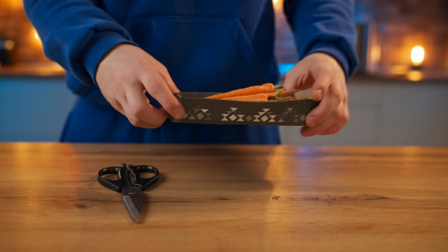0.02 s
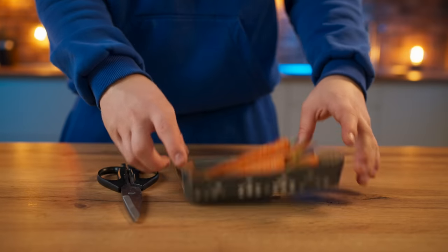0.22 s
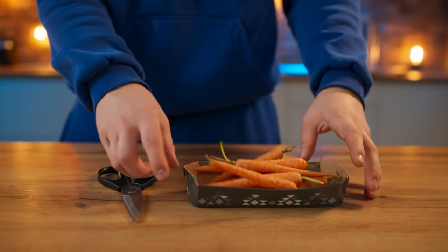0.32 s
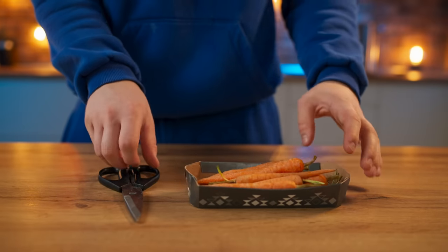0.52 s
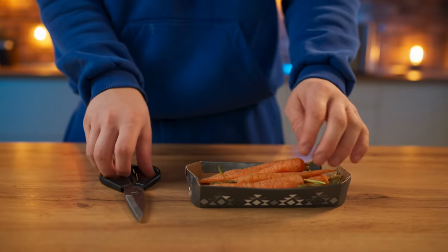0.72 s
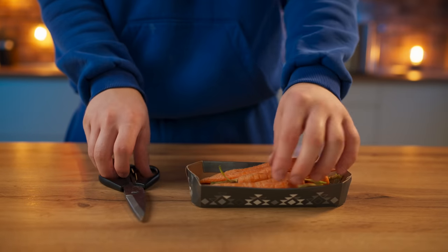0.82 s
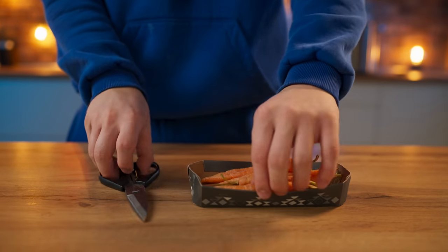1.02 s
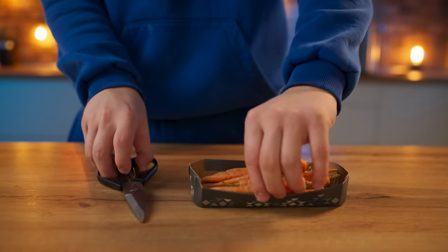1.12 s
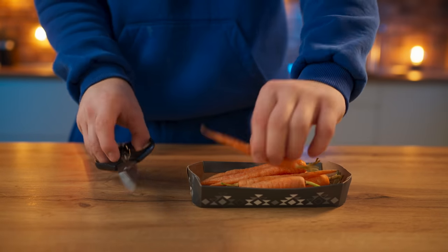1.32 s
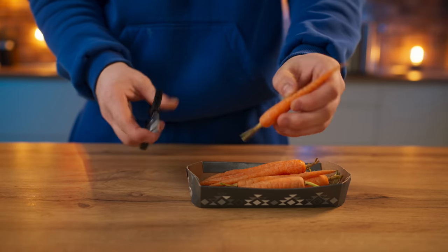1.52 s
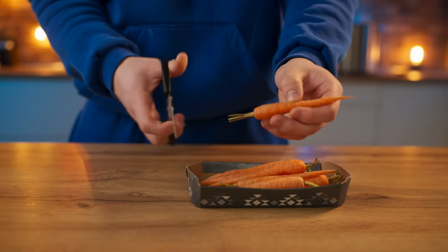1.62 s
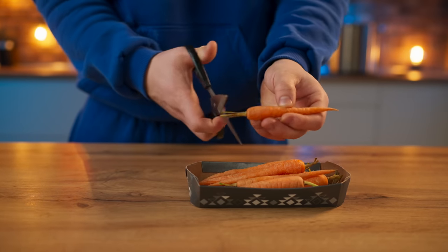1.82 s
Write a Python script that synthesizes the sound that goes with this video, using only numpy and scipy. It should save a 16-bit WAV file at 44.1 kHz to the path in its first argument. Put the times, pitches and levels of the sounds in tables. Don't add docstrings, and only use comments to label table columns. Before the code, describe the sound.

A carrot-filled cardboard tray slaps onto a wooden table at about 0.23 s, a quick cluster of crack, rattle, air clap and woody thud with a short room tail. Faint scrapes and a tick precede it. Carrots roll and bump until 0.5, then knock with a bright click near 0.78. Light scissor scrapes continue to 1.3; metallic ticks and sleeve rustle follow at 1.5-1.6 over faint hum.

```python
import sys
import numpy as np
from scipy import signal
from scipy.fft import rfft, irfft
from scipy.io import wavfile
from scipy.ndimage import uniform_filter1d

SR = 44100
rng = np.random.default_rng(int(sys.argv[2]) if len(sys.argv) > 2 else 0)


def ratio(d):
    e = np.asarray(d, float) / 20
    return 10 ** e


def unload_wav(signal):
    wavfile.write(
        sys.argv[1],
        SR,
        np.round(np.clip(np.atleast_2d(signal).T, -1, 1) * 32767).astype(np.int16),
    )


N = 83790
T = np.arange(N) / SR

# pitch in Hz, level in dB, t60 in seconds.
TRAY_MODES = [(980, -4, 0.02), (1160, -10.5, 0.047), (1516, -4.5, 0.025), (1700, -5, 0.059),
              (2147, 3.5, 0.018), (2600, 0, 0.013), (3284, -0.5, 0.024), (3800, 2, 0.015),
              (4700, -14.5, 0.0062)]


def level(x, db):
    return x * ratio(db) / np.sqrt(np.mean(x ** 2))


def band(x, hz, width_hz):
    return signal.lfilter(*signal.iirpeak(min(hz, .45 * SR), hz / width_hz, fs=SR), x)


def steep_band(x, hz, width_hz):
    return band(band(x, hz, width_hz), hz, width_hz)


def ring(x, modes):
    out = 0
    for k, (hz, db, t60) in enumerate(modes):
        pole = np.exp(2j * np.pi * hz / SR - np.log(1000) / (t60 * SR))
        out = out + (-1) ** k * ratio(db) * signal.lfilter([1], [1, -pole], x).imag
    return out / 20


def soft(x, push_s):
    keep = np.exp(-1 / (push_s * SR))
    once = signal.lfilter([1 - keep], [1, -keep], x)
    return signal.lfilter([1 - keep], [1, -keep], once)


def blow(at, push_s):
    t = np.maximum(T - at, 0) / push_s
    return t * np.exp(-t) / (push_s * SR)


def burst(at, t60):
    return np.clip((T - at) * SR / 4, 0, 1) * ratio(-60 * np.maximum(T - at, 0) / t60)


def walk(rate):
    k = int(SR / rate)
    steps = np.repeat(rng.standard_normal(N // k + 1), k)
    return 1.3 * uniform_filter1d(steps, k)[:N]


def air():
    # frequency in Hz, density in dB per Hz.
    air_spectrum = [(30, -19), (55, -20), (110, -16.5), (200, -14.5), (900, -23), (1200, -28.5),
                    (3700, -31), (16000, -60.5)]
    # frequency in Hz, level in dB rms.
    mains = [(50, -71.5), (150, -69)]
    air_db, wobble_db = -69, 1.2
    hz = np.maximum(np.arange(N // 2 + 1) * SR / N, 1)
    shape_hz, shape_db = np.array(air_spectrum).T
    shape = np.interp(np.log(hz), np.log(shape_hz), shape_db)
    spectrum = rfft(rng.standard_normal(N)) * ratio(shape) * (hz > 20)
    out = level(irfft(spectrum, N), air_db)
    for f, db in mains:
        out = out + ratio(db + wobble_db * walk(14)) * np.sqrt(2) * np.sin(2 * np.pi * f * T)
    return out


def sleeve():
    # time in seconds, level in dB.
    rustle = [(0, -87), (.7, -78), (.8, -71), (1.25, -78), (1.4, -69.5), (1.6, -70), (1.8, -79.5),
              (1.9, -89)]
    cloth = level(band(rng.standard_normal(N), 6000, 12000), 0) * ratio(walk(14))
    return cloth * ratio(np.interp(T, *np.array(rustle).T))


def scrapes():
    # start in seconds, length in seconds, level in dB, pitch in Hz, width in Hz.
    strokes = [(0.071, 0.17, -62.5, 2300, 1700), (0.03, 0.17, -62.5, 1100, 1100),
               (0.095, 0.12, -66.5, 7850, 9000), (0.69, 0.077, -67, 3800, 580),
               (.65, 0.055, -70, 7900, 9600), (0.862, 0.067, -62.5, 3340, 1900),
               (0.738, 0.12, -58.5, 2650, 2500), (0.957, 0.13, -62.5, 3440, 480),
               (0.967, 0.18, -70, 1380, 300), (1.082, 0.056, -54.5, 3170, 710),
               (1.2, 0.068, -68, 3800, 5200), (1.092, 0.057, -57, 1870, 1360),
               (1.3, 0.037, -67.5, 2300, 1050), (1.277, 0.056, -63, 2770, 1600),
               (1.28, .055, -66, 9400, 10000), (1.475, 0.099, -60, 3700, 850),
               (1.497, 0.039, -51.5, 8900, 2800), (1.518, 0.035, -57.5, 7500, 1220),
               (1.51, 0.044, -60, 1920, 420), (1.499, 0.063, -61.5, 12300, 1210),
               (1.57, 0.016, -69, 11300, 300)]
    grain_db, grains_per_s = 3, 830
    grain = ratio(grain_db * walk(grains_per_s)) * rng.standard_normal(N)
    out = 0
    for s, length, db, hz, width_hz in strokes:
        swell = np.sin(np.pi * np.clip((T - s) / length, 0, 1)) ** 1.5
        out = out + level(steep_band(grain, hz, 1.2 * width_hz), db) * swell
    return out


def ticks():
    # start in seconds, level in dB, pitch in Hz, knock into the tray in dB.
    clicks = [(0.104, -65, 800, 6), (0.167, -39, 1700, -20), (0.186, -60, 1780, 12),
              (0.402, -45.5, 7150, -38.5), (0.5532, -49, 6340, -12), (.600, -66, 4900, -10),
              (0.684, -55.5, 3800, 2), (0.7332, -46.5, 3600, 7.5), (0.739, -56.5, 9000, 17),
              (0.7468, -47, 4480, 9), (.761, -58, 8000, -20), (0.7763, -23, 8400, -64),
              (0.8087, -52, 11000, -30), (0.7807, -26.5, 1200, -22), (0.797, -27, 900, -20),
              (0.809, -35.5, 4950, 3.5), (0.928, -56, 1500, 2.5), (0.9747, -40.5, 4000, -0.5),
              (.9920, -46.5, 4170, -5), (1.098, -51, 3510, 6), (1.126, -50.5, 5394, 7),
              (1.188, -55, 2600, -5), (1.189, -59, 9000, -10), (1.211, -51, 2530, 3),
              (1.212, -60, 8450, -6), (1.533, -54, 3900, -3), (1.515, -52, 9000, -15),
              (1.52, -51.5, 9000, -30), (1.609, -58, 9000, -14), (1.6157, -43.5, 8450, -26),
              (1.614, -40.5, 2300, -18)]
    # pitch in Hz, level in dB, t60 in seconds.
    blades = [(3800, -3, .05), (5200, -4.5, .03), (7000, -0.5, .03), (8350, 0, 0.025), (11000, -22, 0.047),
              (12700, -5.5, .04)]
    click_t60_s, steel_db = .016, -14.5
    hand_damping = 0.6
    noise, out, knock = rng.standard_normal(N), 0, 0
    for s, db, hz, knock_db in clicks:
        click = ratio(db) * burst(s, click_t60_s) * noise
        edges = [hz / 2.3, min(hz * 1.8, .45 * SR)]
        sos = signal.butter(4, edges, "bandpass", fs=SR, output="sos")
        out = out + signal.sosfilt(sos, click)
        knock = knock + ratio(knock_db) * click
    held_tray = [(hz, db, hand_damping * t60) for hz, db, t60 in TRAY_MODES]
    return out + ratio(steel_db) * ring(out, blades) + ring(knock, held_tray)


def tray():
    # start in seconds, level in dB, rattle length in seconds, crack in dB.
    contacts = [
        (0.2254, -29, 0.019, -14.5),
        (0.2315, -19.5, 0.011, -1.5),
        (.2350, -11, 0.01, 4.5),
        (0.2387, -9.5, 0.0044, -1),
        (0.2445, -17, 0.0013, -3),
        (.247, -20.5, 0.0034, -12),
    ]
    # pitch in Hz, level in dB, t60 in seconds.
    table_modes = [(62, -14.5, .25), (40, -24, .1), (123.2, -1, .2), (245.7, -6, 0.12), (263, 2, 0.09),
                   (388, -4, .07), (184, -5.5, 0.12), (344, -10.5, 0.13), (527, -8, 0.052), (658, 0, 0.11),
                   (800, 0.5, 0.052), (1059, -7.5, 0.065)]
    strike_db, clap_db, crack_db, thud_db = 5, 0.5, -4, -2
    crack_t60_s, thud_push_s = .012, 0.00043
    noise = rng.standard_normal(N)
    rattle, crack, strike, thud = 0, 0, 0, 0
    for k, (s, db, length, sharp_db) in enumerate(contacts):
        rattle = rattle + ratio(db) * burst(s, 4 * length) * noise
        crack = crack + ratio(db + sharp_db) * burst(s, crack_t60_s) * noise
        strike = strike + (-1) ** k * ratio(db + strike_db) * blow(s, 1 / SR)
        thud = thud + ratio(db) * blow(s, thud_push_s)
    walls = ring(10 * strike + 1.2 * rattle, TRAY_MODES)
    clap = ratio(clap_db) * steep_band(rattle, 2560, 4600)
    snap = ratio(crack_db) * band(crack, 6500, 9000)
    wood = ratio(thud_db) * 10 * ring(thud, table_modes)
    return walls + clap + snap + wood


def carrots():
    # time in seconds, force in dB.
    roll_force = [(.25, -42.5), (.4, -49.5), (.52, -60), (.56, -54), (.605, -53.5), (.67, -56), (.725, -68),
                  (.74, -43), (.8, -44), (.9, -53), (1.0, -57.5), (1.14, -65.5), (1.28, -78.5)]
    # start in seconds, force in dB, push in seconds.
    falls = [(.548, -34, 0.00044), (.56, -31, 0.00033), (.6, -26.5, 0.00029), (.612, -24.5, 0.0013),
             (.633, -33, 0.00064), (.671, -36, .0001), (.747, -26, 0.00018), (.765, -15.5, 0.0017),
             (.781, -20.5, 0.000088), (.797, -24, 0.0014), (.82, -32, 0.000067), (.9, -37.5, 0.00017),
             (.926, -34, 0.000078), (.976, -21.5, .001), (.993, -36.5, 0.000069), (1.03, -41, 0.0016),
             (1.15, -37, 0.00092), (1.212, -36, 0.00029)]
    # pitch in Hz, level in dB, t60 in seconds.
    loaded = [(110.9, -0.5, 0.088), (140, 1, 0.11), (248, -2.5, .09), (294, -2, 0.071), (338.8, -5, 0.073),
              (530, 0, .055), (561, -1, .045), (684, -1, .05), (800, -3.5, 0.036), (1042, -2.5, 0.025),
              (1287, -4, 0.027), (1545, -3.5, 0.03), (1852, -4.5, 0.018), (2130, -8.5, .02)]
    bumps_per_s, scatter_db, shift_db, push = 500, 3.5, 2.5, 0.00011
    roll_damping = .7
    rolling = 0
    for detune in (-.06, 0, .06):
        hit = rng.random(N) < bumps_per_s / SR
        size, sign = rng.exponential(size=N), rng.standard_normal(N)
        force = ratio(scatter_db * size / 2 + shift_db * walk(17))
        bumps = soft(hit * sign * force, push)
        modes = [(hz * (1 + detune), db, t60 * roll_damping) for hz, db, t60 in loaded[2:]]
        rolling = rolling + ring(bumps, modes)
    rolling = level(rolling, 0) * ratio(np.interp(T, *np.array(roll_force).T, left=-120, right=-120))
    drops = 0
    for k, (s, db, push_s) in enumerate(falls):
        drops = drops + 2 * (-1) ** k * ratio(db) * blow(s, push_s)
    low_cut = signal.butter(2, 70, "highpass", fs=SR, output="sos")
    return signal.sosfilt(low_cut, rolling + ring(drops, loaded))


def thumps():
    # start in seconds, level in dB, pitch in Hz, t60 in seconds.
    knocks = [(.3, -34, 660, 0.12), (.285, -33.5, 234.3, 0.23), (.307, -26.5, 253.7, 0.19),
              (.33, -35.5, 664, 0.088), (.336, -29, 250, 0.17), (0.368, -43, 60, 0.12),
              (.385, -39, 240, .08), (.405, -39, 330.4, 0.16), (.41, -33, 232, 0.07), (.41, -44, 101, 0.13),
              (.44, -39, 255, 0.2), (.5, -46.5, 250, .2), (.549, -46, 300, .06), (.551, -44.5, 529, .08),
              (.562, -41.5, 271, 0.13), (.6, -44, 190, 0.069), (.6, -50, 1045, 0.045),
              (.628, -50, 853, 0.067), (.612, -44, 515, .06), (.63, -47, 130, 0.11),
              (.632, -42.5, 509, 0.12), (.67, -44.5, 304, 0.11), (.672, -56, 1700, 0.035),
              (.752, -41, 263, .07), (.78, -33, 514, 0.064), (0.7798, -35, 1500, 0.032),
              (.7806, -40.5, 2060, 0.031), (.782, -32, 331, 0.055), (.794, -36, 263, 0.066),
              (.806, -40, 1430, 0.048), (.812, -44, 1700, .04), (.815, -39.5, 636, .05),
              (0.854, -52, 1450, 0.033), (.926, -43, 298, .08), (.9262, -47, 690, 0.045),
              (.975, -44.5, 3500, 0.036), (.977, -45.5, 136, 0.11), (.988, -47.5, 1340, 0.065),
              (.997, -47.5, 595, 0.074), (1.093, -48, 650, 0.042), (1.1, -55.5, 200, 0.084),
              (1.21, -52, 371.5, .04), (1.6145, -55.5, 850, 0.028), (1.615, -48, 2890, 0.018)]
    rise_cycles = .6
    out = 0
    for s, db, hz, t60 in knocks:
        swell = 1 - np.exp(-np.maximum(T - s, 0) * hz / rise_cycles)
        out = out + ratio(db) * burst(s, t60) * swell * np.sin(2 * np.pi * hz * (T - s))
    return out


def room(x):
    # octave centre in Hz, level in dB, t60 in seconds.
    octaves = [(124, -19.5, .35), (237, -20.5, 0.44), (492, -18, 0.56), (1050, -13.5, 0.5),
               (1980, -16, .48), (3600, -16, 0.42), (6000, -25, 0.52), (9000, -20, 0.29), (13000, -19, .3)]
    delay_s = 0.0019
    t = T[:SR]
    tail = 0
    for hz, db, t60 in octaves:
        noise = steep_band(rng.standard_normal(SR), hz, hz)
        tail = tail + ratio(db - 60 * t / t60) * noise / np.sqrt(hz * t60 / 10)
    return signal.fftconvolve(x, tail * np.clip(t / delay_s - 1, 0, 1))[:N]


def scene():
    still_air = air()
    hands = sleeve() + scrapes() + carrots() + thumps()
    clicks = ticks()
    pulse = ratio(19.5) * band(blow(.236, 1 / SR), 1500, 7700)
    hands_wet_db, clicks_wet_db = -4.5, -12
    to_room = pulse + ratio(hands_wet_db) * hands + ratio(clicks_wet_db) * clicks
    return (tray() + hands + clicks + room(to_room) + still_air)[None]


def low_pass(x):
    return signal.sosfilt(signal.butter(12, 16850, fs=SR, output="sos"), x)


def record(dry):
    ceiling, low_cut_hz, top_hz = .6, 18, 16400
    low_cut = signal.butter(1, low_cut_hz, "highpass", fs=SR, output="sos")
    top_cut = signal.ellip(12, .2, 100, top_hz, fs=SR, output="sos")
    rounded = ceiling * np.tanh(signal.sosfilt(low_cut, dry) / ceiling)
    return low_pass(signal.sosfilt(top_cut, rounded))


dry = scene()
out = record(dry)
unload_wav(out)
```